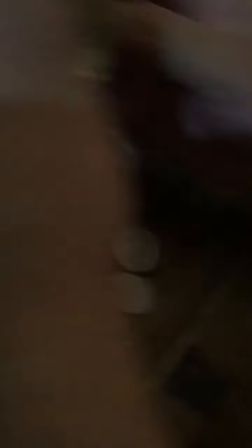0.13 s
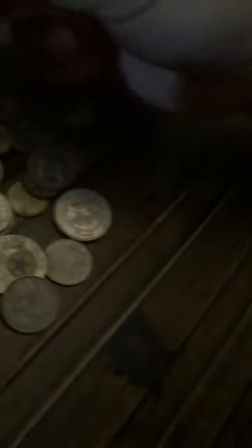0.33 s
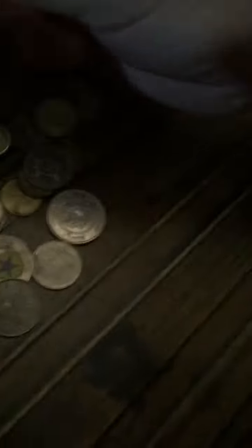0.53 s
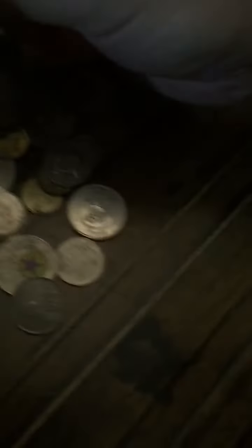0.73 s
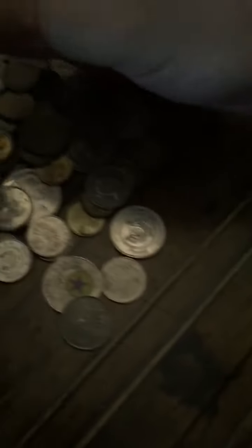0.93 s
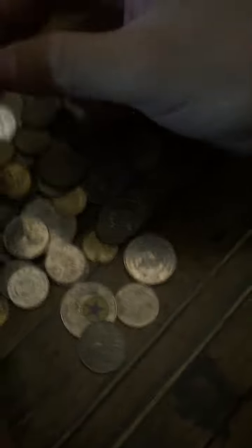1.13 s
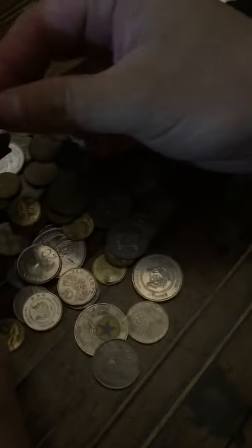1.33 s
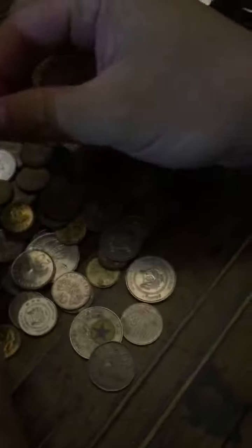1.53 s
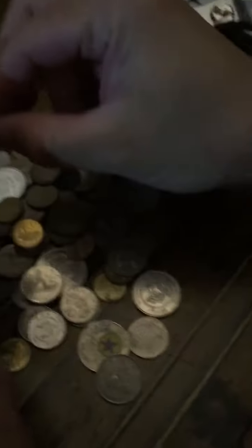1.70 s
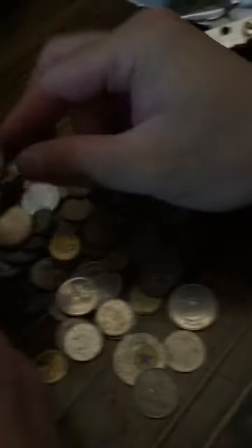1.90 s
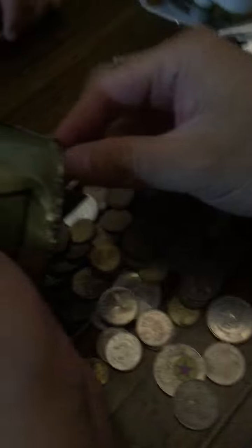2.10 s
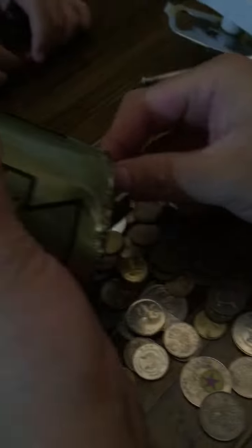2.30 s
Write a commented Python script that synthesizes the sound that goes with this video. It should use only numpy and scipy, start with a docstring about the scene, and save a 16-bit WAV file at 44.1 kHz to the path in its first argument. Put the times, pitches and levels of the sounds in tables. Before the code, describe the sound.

Coins scrape and clack out of a shaken metal can, dropping in clumps that thump wooden boards and jingle the pile. After a brief pause, a last clump lands and light clicks follow, close by in a small room.

```python
"""Coins are shaken out of a metal can onto a pile of coins on wooden boards, close by in a small room.
First they slide, scrape and clack against the can wall. Clumps drop near 0.45, 0.6 and 1.2 s; each thumps
the boards and sets the pile jingling, and now and then a loose coin rings on. At 1.4 s the can shifts
with a dull rub and the coins pause. They slide again, a last clump lands near 2 s, light clicks follow."""
import sys
import numpy as np
from scipy import signal
from scipy.io import wavfile

SR = 44100
rng = np.random.default_rng(int(sys.argv[2]) if len(sys.argv) > 2 else 0)


def write(x):
    x = np.atleast_2d(x).T
    wavfile.write(sys.argv[1], SR, np.round(np.clip(x, -1, 1) * 32767).astype(np.int16))


N = 103635

# coin blows, relative levels: start_s, clack_peak_db, knock_db, jingle_db
COIN_BLOWS = [(0.048, -19.5, -33, -33), (0.0872, -54, -45, -37), (0.1149, -18, -38.5, -39),
              (0.1873, -20.5, -38, -36), (0.247, -3.5, -26, -17.5), (0.2684, -26, -58, -23),
              (0.2856, -39, -34.5, -27), (0.2949, -9.5, -31.5, -23), (0.3246, -9.5, -34, -38),
              (0.347, -7, -30, -30), (0.3946, -12.5, -36, -24.5), (0.4355, -13, -43, -37),
              (0.45, -1, -13, -12), (0.4801, -15.5, -52, -14.5), (0.5104, -17.5, -44, -16),
              (0.599, -10, -26, -13.5), (0.622, -12, -26, -10.5), (0.6619, -10.5, -38.5, -13),
              (0.6916, -25.5, -31, -18), (0.7205, -23, -37, -28), (0.7954, -20.5, -42, -40.5),
              (0.9748, -24.5, -58, -38), (1.0116, -10.5, -42, -48), (1.0206, -17.5, -62, -26),
              (1.0518, -16, -45, -33.5), (1.095, -20, -48, -50), (1.1216, -25, -39.5, -39.5),
              (1.1728, -6, -27.5, -14.5), (1.1761, -13, -29, -16.5), (1.197, -28, -42, -22),
              (1.2393, -25, -39.5, -51), (1.2507, -6.5, -40, -35), (1.2834, -16.5, -48, -31),
              (1.31, -20.5, -38, -29.5), (1.3805, -20, -51, -40), (1.3979, -15.5, -53, -31.5),
              (1.4212, -17.5, -44.5, -56), (1.7249, -14, -50.5, -28), (1.951, -12.5, -38.5, -25),
              (1.9621, 1, -21, -11.5), (2.0046, -10, -47, -13.5), (2.082, -17.5, -59, -34),
              (2.1333, -22, -73, -53), (2.2151, -18.5, -40, -42), (2.2356, -27.5, -54, -42.5),
              (2.2915, -27.5, -58, -42.5), (2.3258, -28, -46.5, -42)]
PILE_LOW_HZ, PILE_TOP_HZ = 11530, 15270
GRAZE_S = 0.002  # decay time of a rim graze; it leads the landing by three of these


def falling_coins(part_count=6):
    """Blows land on different parts of the pile in turn and set each jingling."""
    parts = np.zeros((part_count, N))
    for k, (start_s, *levels_db) in enumerate(COIN_BLOWS):
        add(parts[k % part_count], start_s - 3 * GRAZE_S, blow(*levels_db))
    return sum(part + pile(part) for part in parts)


def blow(peak_db, knock_db, jingle_db, size=4096, chatter_s=0.0056, chatter_per_s=1500):
    """A graze, one hard contact and a few ms of chatter, each ringing briefly in the damped stack."""
    # spectrum common to all blows: freq_hz, gain_db
    blow_colour = [(30, -25), (100, -13.5), (250, 0.5), (450, 4.5), (900, -1), (1500, -1.5), (3500, -2.5),
                   (5000, -2), (8000, -3.5), (10500, -4.5), (13000, -3), (15000, -10), (16000, -4)]
    knock_hz, jingle_hz = 725, 11600
    t = np.arange(size) / SR
    landed_s = t - 3 * GRAZE_S
    graze_db = min(-16 - 1.1 * peak_db, 0)  # light blows are mostly graze
    graze = amp(graze_db) * np.exp(-abs(landed_s) / GRAZE_S)
    chatter = np.exp(-(landed_s / chatter_s) ** 2)
    force = np.where(landed_s > 0, chatter, graze)
    contacts = force * rng.standard_normal(size) * (rng.random(size) < chatter_per_s / SR)
    contacts[np.argmax(landed_s > 0)] = 1  # hard contact
    stack = np.exp(-t / 0.0007) + 0.18 * decay(t, t60_s=0.018)
    energy = abs(signal.fftconvolve(contacts ** 2, stack ** 2)[:size])
    clack = unit_rms(np.sqrt(energy) * rng.standard_normal(size))
    clack_db = peak_db - 14  # crest factor
    bands = [(knock_hz, knock_db), (1770, clack_db), (4200, clack_db), (jingle_hz, jingle_db)]
    tint_hz = np.geomspace(knock_hz / 2, jingle_hz, 20)
    tint_db = 1.6 * rng.standard_normal(len(tint_hz))  # each blow strikes a different spot
    return amp(-3.5) * colour(clack, bands, blow_colour, np.transpose([tint_hz, tint_db]))


def pile(drive, count=70):
    """A random handful of coins in the pile rings in answer to the drive."""
    t = np.arange(SR // 5) / SR
    spread = (np.arange(count)[:, None] + rng.random((count, 1))) / count
    pitch_hz = PILE_LOW_HZ + (PILE_TOP_HZ - PILE_LOW_HZ) * spread
    t60_s = 0.095 * np.exp(0.33 * rng.standard_normal((count, 1)))
    ring = (rng.choice([-1, 1], (count, 1)) * decay(t, t60_s) * sine(t, pitch_hz)).sum(0)
    return 0.2413 * signal.fftconvolve(drive, ring / np.linalg.norm(ring))[:N]


def sliding_coins(slips_per_s=900, slip_s=0.00083, spread_db=5, sag_db=-12.5):
    """Dense tiny slips of metal over metal; their treble stirs the pile."""
    # slides, relative levels: start_s, length_s, scrape_db, treble_db
    slides = [(0, 0.24, -42.5, -56), (0.266, 0.13, -37.5, -29), (0.47, 0.096, -35, -23),
              (0.61, 0.19, -37.5, -29.5), (0.874, 0.6, -53.5, -56), (0.99, 0.095, -40.5, -44),
              (1.187, 0.13, -37.5, -28.5), (1.396, 0.041, -34, -32), (1.678, 0.072, -45.5, -46),
              (1.734, 0.088, -59, -72), (1.807, 0.16, -44.5, -42.5), (1.884, 0.057, -39, -36),
              (1.955, 0.17, -41, -31), (2.13, 0.087, -47, -48.5), (2.304, 0.17, -49, -51)]
    # friction spectrum: freq_hz, gain_db
    slide_colour = [(60, -18), (280, -9), (480, 4.5), (800, -5), (1500, 2), (3700, 1.5), (5000, -1),
                    (8000, -4), (11000, -3.5), (14500, 0), (16000, -14)]
    slipping = rng.random(N) < slips_per_s / SR
    slips = slipping * amp(spread_db * np.minimum(rng.exponential(1, N), 4))
    energy = signal.lfilter([1], [1, -np.exp(-1 / (slip_s * SR))], slips ** 2)
    grains = unit_rms(np.sqrt(energy) * rng.standard_normal(N) * lurch())
    scrape = colour(grains, slide_colour, [(5000, 2), (9000, 4), (12000, -40)])
    scrape *= sum(stroke(start_s, length_s, db, sag_db) for start_s, length_s, db, _ in slides)
    treble = colour(grains, slide_colour, [(3000, -39.5), (7000, -2), (11000, -2.5)])
    treble *= sum(stroke(start_s, length_s, db, sag_db) for start_s, length_s, _, db in slides)
    return amp(1) * (scrape + treble + pile(treble))


def lurch(depth_db=1.5, step_s=0.012):
    """Quick random swells as the coins catch and let go."""
    knots = rng.standard_normal(1000)
    return amp(depth_db * np.interp(np.arange(N) / SR / step_s, np.arange(len(knots)), knots))


def stroke(start_s, length_s, level_db, sag_db, ramp_s=0.01):
    """Envelope of one slide: it starts up, loses speed and stops."""
    t = np.arange(N) / SR - start_s
    rise = np.clip(t / ramp_s, 0, 1) ** 2
    fall = np.clip((length_s - t) / ramp_s + 0.5, 0, 1)
    progress = np.clip(t / length_s, 0, 1)
    return rise * fall * amp(level_db + sag_db * (progress - 0.5))


def can(drive):
    """The thin can wall rings briefly with every blow and scrape."""
    # wall modes: pitch_hz
    modes_hz = [1086, 1481, 1846, 2223, 2976, 3730, 4172, 5970]
    t = np.arange(SR // 10) / SR
    fade = decay(t, t60_s=0.026)
    ring = sum(sine(t, hz) for hz in modes_hz) * fade * 2 / fade.sum()
    return amp(1) * signal.fftconvolve(drive, ring)[:N]


def clanks():
    """Short damped notes of the can wall, roughened by neighbouring modes."""
    # blows on the wall: start_s, pitch_hz, level_db
    wall_hits = [(0.161, 950, -27), (0.162, 1680, -24), (0.251, 3480, -19.5), (0.397, 2240, -21),
                 (0.396, 3800, -16.5), (0.436, 1345, -21.5), (0.977, 3680, -17), (1.011, 3580, -32),
                 (1.223, 3370, -18), (1.249, 1365, -18.5), (1.251, 2280, -16), (1.253, 3150, -14),
                 (1.38, 7750, -17.5), (1.652, 311, -40.5), (1.726, 4160, -21), (2.218, 507, -35)]
    out, t = np.zeros(N), np.arange(SR // 10) / SR
    for start_s, pitch_hz, level_db in wall_hits:
        neighbours = sine(t, pitch_hz * rng.uniform(0.92, 1.0, (4, 1))).mean(0)
        t60_s = 0.021 * np.sqrt(2000 / pitch_hz)
        add(out, start_s, amp(level_db) * decay(t, t60_s) * (sine(t, pitch_hz) + neighbours) / 2)
    return out


def boards(rise_s=0.00018):
    """Heavy clumps thump the wood: a dead thud and a few modes."""
    # clump landings: start_s, gain_db
    thumps = [(0.451, -23.5), (0.6, -25.5), (1.174, -36.5), (1.963, -21)]
    # board modes: pitch_hz, gain_db, t60_s
    board_modes = [(117.4, -12.5, 0.43), (198.4, -22, 0.28), (391.4, -1, 0.07), (955, 3, 0.037),
                   (1386, -4, 0.08)]
    # thud spectrum: freq_hz, gain_db
    thud_colour = [(30, -28), (120, 7.5), (330, 3.5), (700, 3), (1200, 5.5), (3000, -6.5), (9000, -63)]
    out, t = np.zeros(N), np.arange(SR // 2) / SR
    for start_s, gain_db in thumps:
        modes = sum(amp(db) * decay(t, t60_s) * np.sin(2 * np.pi * (hz * t + rng.random()))
                    for hz, db, t60_s in board_modes)
        burst = rng.standard_normal(len(t)) * decay(t, t60_s=0.036)
        thud = amp(14.5) * colour(burst, thud_colour)
        add(out, start_s, amp(gain_db) * (modes + thud) * (1 - np.exp(-t / rise_s)))
    return out


def tinkles(count=12, mean_delay_s=0.021):
    """Each blow jostles a few coins, whose short rings overlap into a shimmer."""
    out, t = np.zeros(N), np.arange(SR // 10) / SR
    for start_s, _, _, jingle_db in COIN_BLOWS:
        for wait, spread in rng.random((count, 2)):
            pitch_hz = PILE_LOW_HZ + (PILE_TOP_HZ - PILE_LOW_HZ) * spread
            delay_s = -mean_delay_s * np.log(1 - wait)
            gain = amp(jingle_db - 10.5) * np.sqrt(1 - wait)  # later is weaker
            add(out, start_s + delay_s, gain * decay(t, t60_s=0.06) * sine(t, pitch_hz))
    return out


def ringing_coins(rise_s=0.0015, fade_db_per_s=144, stop_s=0.0023, tremble_s=0.005):
    """Loose coins ring on, trembling against their neighbours until one stops them."""
    # free rings: start_s, pitch_hz, level_db, length_s
    rings = [(0.011, 13200, -37, .01), (0.087, 10230, -49, .14), (0.087, 11165, -47, .12),
             (0.251, 12209, -28, .055), (0.451, 13471, -26, .03), (0.721, 13501, -24, .018),
             (0.802, 12010, -37, .028), (1.173, 14818, -25, .08), (1.428, 11553, -33, .008),
             (1.962, 9440, -26, .155), (2.004, 14950, -25, .02), (2.082, 9440, -40, .038),
             (2.079, 14830, -36, .03)]
    out, t = np.zeros(N), np.arange(SR // 2) / SR
    knots_s = np.arange(0, 1, tremble_s)
    for start_s, pitch_hz, level_db, length_s in rings:
        jitter = rng.standard_normal((1024, 2)) @ [1, 1j]  # complex: level and phase both waver
        tremble = np.interp(t, knots_s, jitter[:len(knots_s)])
        tone = ((1 + tremble) * np.exp(2j * np.pi * pitch_hz * t)).imag
        envelope = amp(level_db - fade_db_per_s * t) * np.minimum(t / rise_s, 1)
        stop = np.exp(-np.maximum(t - length_s, 0) / stop_s)
        add(out, start_s, envelope * stop * tone)
    return out


def rub():
    """Soft friction of the can shifting in the hand."""
    # hand stroke: start_s, length_s, level_db
    shift = (1.439, 0.14, -45.5)
    # rub spectrum: freq_hz, gain_db
    rub_colour = [(100, -10), (500, -5), (1200, -0.5), (2200, -2), (4000, -17.5), (6500, -46)]
    return unit_rms(colour(rng.standard_normal(N), rub_colour)) * stroke(*shift, sag_db=-10.5)


def room(source, wall_count=8, walls_db=-15.5, tail_db=-9.5, build_s=0.0024):
    """A few near reflections and a short diffuse tail."""
    # reverberation time: freq_hz, t60_s
    room_t60 = [(100, 0.51), (500, 0.41), (2000, 0.36), (6000, 0.28), (14000, 0.16)]
    hz, t, noise = signal.stft(rng.standard_normal(SR * 3 // 4), SR, nperseg=256)
    envelope = decay(t, lookup(room_t60, hz)[:, None]) * (1 - np.exp(-t / build_s))
    response = signal.istft(noise * envelope, SR, nperseg=256)[1]
    response *= amp(tail_db) / np.linalg.norm(response)
    wall_taps = (rng.uniform(0.002, 0.022, wall_count) * SR).astype(int)
    response[wall_taps] += amp(walls_db) * rng.choice([-1, 1], wall_count) / np.sqrt(wall_count)
    return signal.fftconvolve(source, response)[:N]


def rumble(level_db=-57):
    """Faint steady low noise of the room."""
    # background spectrum: freq_hz, gain_db
    rumble_colour = [(20, -30), (45, -29), (70, 3), (130, -6.5), (300, -10.5), (700, -18.5), (2000, -18),
                     (6000, -37)]
    return amp(level_db) * unit_rms(colour(rng.standard_normal(N), rumble_colour))


def amp(db):
    """Decibels to gain."""
    return 10 ** (np.asarray(db) / 20)


def unit_rms(x):
    """Scales to rms 1."""
    return x / np.sqrt(np.mean(x ** 2) + 1e-20)


def sine(t, hz):
    """Unit sine from zero phase."""
    return np.sin(2 * np.pi * hz * t)


def decay(t, t60_s):
    """Falls 60 dB in t60_s."""
    return np.exp(-np.log(1000) * t / t60_s)


def lookup(table, hz):
    """Interpolates along log frequency."""
    freq_hz, value = np.transpose(table)
    return np.interp(np.log(hz + 1), np.log(freq_hz + 1), value)


def add(mix, start_s, sound):
    """Mixes a sound in at start_s."""
    part = mix[max(round(start_s * SR), 0):][:len(sound)]
    part += sound[:len(part)]


def colour(x, *tables, size=2048):
    """Minimum-phase filter from summed (freq_hz, gain_db) tables."""
    hz = abs(np.fft.fftfreq(size, 1 / SR))
    log_gain = np.log(amp(sum(lookup(table, hz) for table in tables)))
    taps = np.fft.ifft(np.exp(np.conj(signal.hilbert(log_gain)))).real
    return signal.fftconvolve(x, taps)[:len(x)]


def scene(sway_hz=5):
    """Coins, can and boards in the room, over its rumble; mono."""
    coins = falling_coins() + sliding_coins()
    direct = coins + can(coins) + tinkles() + ringing_coins() + boards() + clanks()
    background = rumble()
    sway_rad = 2 * np.pi * sway_hz * np.arange(N) / SR  # echoes shift as the coins move
    echo = room(direct * np.sin(sway_rad)) + room(direct * np.cos(sway_rad))
    return (direct + echo + rub() + background)[None]


def record(dry, ceiling=0.6, cutoff_hz=15600):
    """Soft overload on the highest peaks, then a low-pass."""
    clipped = ceiling * np.tanh(dry / ceiling)
    low_pass = signal.firwin(255, cutoff_hz, window=("kaiser", 8), fs=SR)
    return signal.oaconvolve(clipped, low_pass[None], "same")


dry = scene()
out = record(dry)
write(out)
```